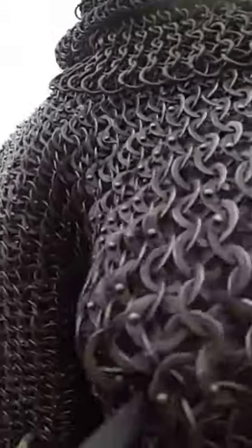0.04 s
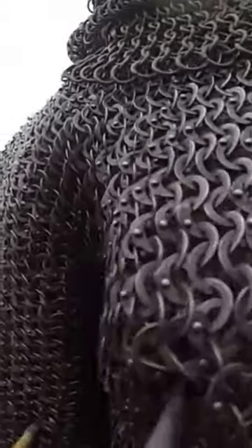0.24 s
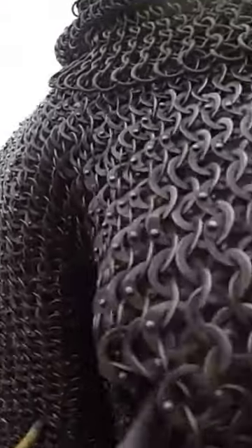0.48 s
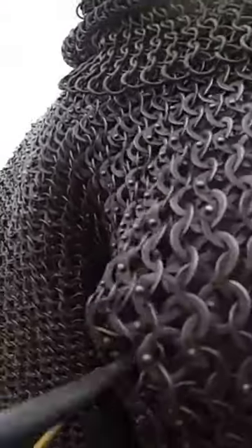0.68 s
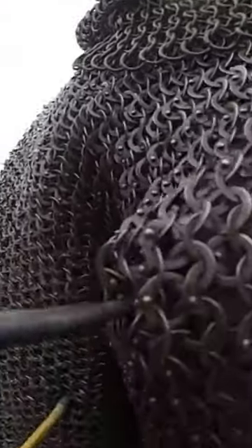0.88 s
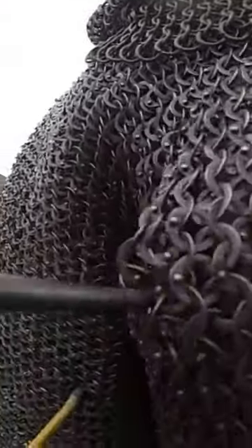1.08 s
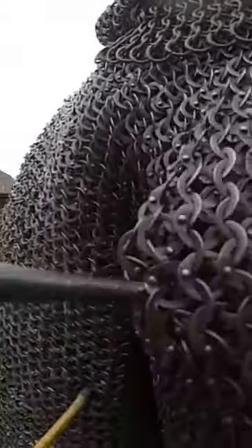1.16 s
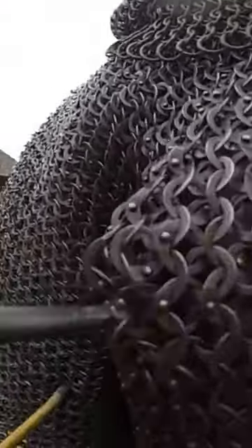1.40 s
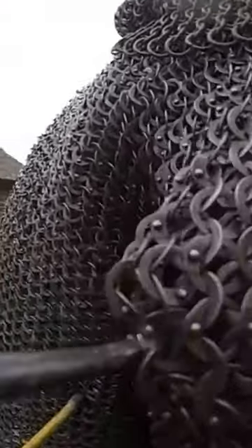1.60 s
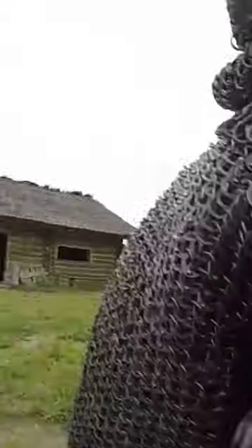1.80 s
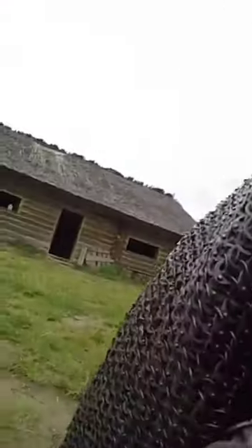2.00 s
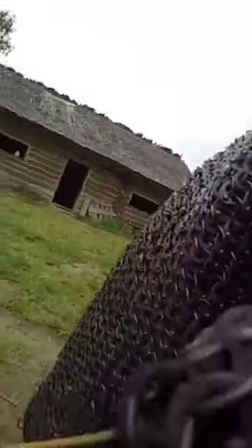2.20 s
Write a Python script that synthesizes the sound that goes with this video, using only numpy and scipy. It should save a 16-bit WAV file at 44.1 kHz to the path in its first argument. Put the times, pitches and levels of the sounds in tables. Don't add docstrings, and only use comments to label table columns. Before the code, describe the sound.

Low wind rumble slaps the microphone hard in the first second, dips, then returns more weakly; close dry wooden knocks, tiny metallic link ticks and faint ring rustles sit over a soft open-field hiss.

```python
import sys
import numpy as np
from scipy import signal
from scipy.fft import rfft, irfft
from scipy.io import wavfile
from scipy.ndimage import uniform_filter1d

SR = 44100
rng = np.random.default_rng(int(sys.argv[2]) if len(sys.argv) > 2 else 0)


def transcribe(u):
    v = np.clip(np.atleast_2d(u).T, -1, 1)
    q = np.round(v * 32767).astype(np.int16)
    wavfile.write(sys.argv[1], SR, q)


def rack_gain(trim_db):
    fader = np.asarray(trim_db, float)
    return 10 ** (fader / 20)


N = 99225


def evened(x):
    return x / np.sqrt(np.mean(x ** 2) + 1e-20)


def coloured(x, points):
    f, db = np.transpose(points)
    hz = np.fft.rfftfreq(len(x), 1 / SR)
    gain = rack_gain(np.interp(np.log(hz + 1), np.log(f + 1), db))
    return evened(irfft(rfft(x) * gain, len(x)))


def steadied(x, window_s):
    size = int(window_s * SR)
    power = uniform_filter1d(uniform_filter1d(x ** 2, size), size)
    return x / np.sqrt(abs(power) + 0.18)


def add(mix, s, sound):
    part = mix[max(round(s * SR), 0):][:len(sound)]
    part += sound[:len(part)]


def resonate(x, hz, width_hz):
    r = np.exp(-np.pi * width_hz / SR)
    return signal.lfilter([1, 0, -1], [1, -2 * r * np.cos(2 * np.pi * hz / SR), r * r], x)


def resonate_twice(x, hz, width_hz):
    return resonate(resonate(x, hz, width_hz), hz, width_hz)


def wind():
    # t/s, level/dB
    gusts = [(0, -27.5), (.07, -57), (.12, -27), (0.228, -23.5), (0.274, -7), (.39, -20), (.45, -15),
             (.78, -15), (.82, -17.5), (1.06, -19), (1.23, -32), (1.299, -21.5), (1.629, -20.5),
             (1.698, -12.5), (1.79, -22.5), (2.04, -25), (2.09, -41), (2.2, -30)]
    # start/s, length/s, level/dB
    flurries = [(0, 0.22, -32), (.25, 0.02, -30.5), (0.285, 0.039, -33), (0.389, 0.031, -29.5),
                (0.516, 0.052, -27.5), (0.58, 0.03, -13), (0.624, 0.039, -16), (0.662, 0.07, -18.5),
                (0.729, 0.05, -29.5), (0.757, 0.044, -18.5), (0.837, 0.12, -27.5), (0.973, 0.083, -31),
                (1.084, 0.13, -36), (1.29, 0.068, -32), (1.596, 0.061, -29.5), (1.668, 0.067, -24),
                (1.886, 0.05, -35.5), (1.991, .4, -48)]
    # f/Hz, level/dB
    boom_spectrum = [(8.8, -53), (15, -9.5), (38, 15.5), (76, 3), (124, -2.5), (178, -21.5), (216, -16),
                     (400, -55.5), (520, -25.5), (880, -120)]
    # f/Hz, level/dB
    flutter_spectrum = [(60, -18), (110, -0.5), (180, 3.5), (300, -14), (500, -28.5), (800, -51.5),
                        (1500, -125)]
    # f/Hz, level/dB
    rasp_spectrum = [(150, -35), (260, 8), (420, -6.5), (620, -23), (850, -40), (1500, -84)]
    flurry_edge_s, rasp_from_db = 0.00455, -21.5
    moan_hz, moan_width_hz, moan_db, moan_end_s = 180, 6, -30, 0.215

    t = np.arange(N) / SR
    gust_db = np.interp(t, *np.transpose(gusts))
    boom_noise, flutter_noise, moan_noise, lump_noise, rasp_noise = rng.standard_normal((5, N))
    boom = rack_gain(-2.5 + gust_db) * steadied(coloured(boom_noise, boom_spectrum), 0.092)

    flutter_level, rasp_level = rack_gain(-20 + gust_db), np.zeros(N)
    for start, length, level_db in flurries:
        shape = np.clip(np.minimum(t - start, start + length - t) / flurry_edge_s, 0, 1) ** 2
        flutter_level = flutter_level + rack_gain(level_db) * shape
        rasp_db = level_db - 20.0 + 0.89 * (level_db - rasp_from_db)
        rasp_level = rasp_level + rack_gain(rasp_db) * shape
    slow_noise = coloured(lump_noise, [(5, -8.0), (35, -10.5), (80, -16.0), (200, -90)])
    lumps = evened(rack_gain(1.85 * slow_noise))
    flutter = flutter_level * steadied(coloured(flutter_noise, flutter_spectrum), 0.03)
    rasp = rasp_level * steadied(coloured(rasp_noise, rasp_spectrum), 0.0033)

    moan = steadied(evened(resonate_twice(moan_noise, moan_hz, moan_width_hz)), 0.022)
    moan_swell = np.clip((moan_end_s - t) / 0.038, 0, 1) * (0.13 + 6.4 * t)
    return boom + lumps * (flutter + rasp) + rack_gain(moan_db) * moan * moan_swell


def air():
    # f/Hz, level/dB
    hiss_spectrum = [(120, -40), (200, -12), (299, -6.5), (683, -18.5), (1680, -20), (2750, -25.5),
                     (6640, -29), (14600, -41.5), (16000, -43)]
    level_db, fade_db_per_s = -52, -1
    band_hz, band_width_hz, band_db = 1790, 380, -19.5
    patchy_db, flicker_db = 1.1, 0.3

    frames = N // 128 + 6
    noise = coloured(rng.standard_normal(frames * 128), hiss_spectrum)
    z = signal.stft(noise, nperseg=512, noverlap=384)[2]
    patches = uniform_filter1d(rng.standard_normal(z.shape), 30, 0)
    patches = evened(uniform_filter1d(patches, 14, 1))
    flicker = evened(uniform_filter1d(rng.standard_normal(z.shape[1]), 5))
    z = z * rack_gain(patchy_db * patches + flicker_db * flicker)
    hiss = signal.istft(z, nperseg=512, noverlap=384)[1][:N]
    hiss = hiss + rack_gain(band_db) * hiss.std() * evened(resonate(hiss, band_hz, band_width_hz))
    top = signal.sosfilt(signal.butter(4, 600, "high", fs=SR, output="sos"), hiss)
    return hiss / top.std() * rack_gain(level_db + fade_db_per_s * (np.arange(N) / SR - 2.0))


def taps():
    # t/s, tick level/dB, knock level/dB, link ring f/Hz, knock f/Hz
    contacts = [(0.0658, -38, -36.5, 3600, 1290), (0.1245, -42, -26, 2900, 630),
                (.180, -29.5, -35, 6740, 1200), (0.2409, -38.5, -52, 9350, 900),
                (.253, -36, -43, 9200, 890), (0.2640, -34, -55.5, 12900, 700),
                (.3545, -38, -33, 7660, 2960), (0.3622, -44, -21.5, 3480, 1454),
                (.3643, -28.5, -25.5, 4420, 1616), (.3695, -54, -22.5, 4000, 1380),
                (0.676, -34.5, -37, 4100, 1190), (0.423, -35, -34, 6440, 1240),
                (0.464, -35, -42, 7900, 2050), (0.658, -41, -40, 4230, 1520),
                (0.696, -29.5, -50, 6400, 1390), (.7085, -38.5, -63, 4930, 1400),
                (0.734, -50, -33.5, 4960, 1670), (0.8358, -31, -47, 4950, 4900),
                (1.11, -41, -61, 9400, 1400), (1.2663, -45, -48, 9500, 1140),
                (1.2892, -27, -29.5, 5100, 1184), (1.298, -22, -38, 10000, 2910),
                (1.3135, -38, -34.5, 9100, 820), (1.4364, -41.5, -57, 9100, 1400),
                (1.4883, -35, -60, 6340, 1400), (1.691, -41.5, -55, 9550, 1390),
                (1.871, -52, -45, 6100, 1850), (2.022, -43, -42, 4160, 1400), (.366, -36, -30, 5200, 930),
                (.393, -38, -32, 4900, 700), (.3975, -41, -29.5, 5000, 780), (.4025, -37, -34, 4000, 1095),
                (.415, -41, -41, 4000, 1110), (.680, -30, -38.5, 6400, 3065),
                (.6985, -31.5, -55, 4900, 1410), (.719, -41, -58, 5000, 1410),
                (1.296, -24.5, -29, 5000, 1050), (1.2995, -21.5, -43, 6150, 2530),
                (1.3055, -33, -37, 7500, 1400), (1.498, -35.5, -37, 6340, 1310)]
    # f/Hz, level/dB, decay by 60 dB/s
    shaft_modes = [(486, -1.5, 0.023), (1090, -3.5, 0.023), (1394, 6, 0.017), (2024, 0.5, 0.019),
                   (2860, -2, 0.016), (4160, -6.5, 0.015)]
    main_mode_hz = shaft_modes[2][0]
    attack_s, tick_t60_s, snap_t60_s, ring_t60_s = 0.00042, 0.022, 0.0044, 0.013
    knock_gain_db, ring_db, ring_width_hz = 0.5, -3.5, 360
    knock_noise, tick_bright, snap = 0.2, 0.16, 0.79

    out, t = np.zeros(N), np.arange(2200) / SR
    tick_decay = rack_gain(-60 * t / tick_t60_s) + snap * rack_gain(-60 * t / snap_t60_s)
    noises = rng.standard_normal((len(contacts), 2, len(t)))
    for (s, tick_db, knock_db, ring_hz, knock_hz), z in zip(contacts, noises):
        knock = np.zeros(len(t))
        for k, (hz, db, t60) in enumerate(shaft_modes):
            mode_hz = hz * knock_hz / main_mode_hz * (1 + 0.023 * z[1, k])
            knock += rack_gain(db - 60 * t / t60) * np.sin(2 * np.pi * mode_hz * t + z[1, k + 9])
        roughness = 8 * uniform_filter1d(uniform_filter1d(z[0], size=20), size=14)
        knock = knock * (1 + knock_noise * roughness) / 2
        tick = signal.lfilter([1, -tick_bright], [1], z[1]) * tick_decay / 3
        ring = resonate(z[0] * rack_gain(-60 * t / ring_t60_s), ring_hz, ring_width_hz)
        link = tick + rack_gain(ring_db) * ring / abs(ring).max()
        contact = rack_gain(knock_db + knock_gain_db) * knock + rack_gain(tick_db) * link
        add(out, s, np.minimum(t / attack_s, 1) * contact)
    return out


def rustles():
    # start/s, length/s, level/dB, centre f/Hz
    slides = [(0.088, 0.01, -49.5, 5660), (0.129, 0.032, -47.5, 9200), (0.345, 0.023, -54, 7000),
              (0.373, 0.024, -45, 6500), (0.261, 0.15, -52, 1890), (0.463, 0.016, -44.5, 1950),
              (0.383, 0.03, -45, 1350), (0.432, 0.051, -52, 6250), (0.433, 0.022, -46, 1890),
              (0.568, 0.12, -54.5, 1930), (0.671, 0.018, -48, 3070), (0.69, 0.024, -49.5, 5800),
              (0.895, 0.059, -56.5, 4600), (1.003, 0.056, -54, 4470), (1.157, .05, -59.5, 9100),
              (1.304, 0.011, -55, 8900), (1.493, 0.025, -59, 6900), (1.67, 0.078, -61, 5500),
              (1.861, 0.14, -56, 1870), (0.468, 0.014, -64, 7200), (0.553, 0.025, -60, 8700),
              (0.946, 0.13, -63, 10200), (1.894, 0.11, -61, 5600), (2.121, .12, -65, 2830),
              (0.42, 0.02, -58, 13000)]
    grains_per_s, grain_spread_db = 9000, -1.5
    relative_width, wide_db = 0.83, -5

    out = np.zeros(N)
    for (s, length, db, hz), z in zip(slides, rng.random((len(slides), 3, 8000))):
        n = int(length * SR)
        hits = z[0] < grains_per_s / SR
        grains = hits * np.sign(z[1] - 0.5) * rack_gain(-grain_spread_db * np.log(z[2] + 0.017))
        body = evened(resonate_twice(grains, hz, relative_width * hz))
        wide = evened(signal.lfilter([1, -0.4], [1], grains))
        swell = np.sin(np.pi * (np.arange(n) / n) ** 1.16) ** 0.095
        add(out, s, rack_gain(db) * (body + rack_gain(wide_db) * wide)[:n] * swell)
    return out


def slaps():
    # centre t/s, peak level/dB, f/Hz, length/cycles
    eddies = [(0.142, -26, 40, 0.73), (0.267, 1.5, 64, 2.44), (0.328, -3, 72.8, 0.79),
              (0.438, -2.5, 43.4, 1.16), (0.484, -6, 61, 1.16), (.545, -5.5, 34.5, 0.81),
              (0.601, -3, 85, 0.7), (.64, -10, 171, 3.3), (0.669, -3.5, 87, 1.2), (0.687, -8, 44, 1.55),
              (0.737, -1.5, 109.6, 2.08), (0.769, -5, 117, 1.2), (0.788, -2.5, 74, 0.92),
              (0.898, -7.5, 56.4, 1.17), (0.943, -8.5, 44.8, 0.39), (1.055, -13.5, 42, 1.3),
              (1.324, -10, 85, 1.64), (1.35, -15.5, 39.2, 1.25), (1.442, -21.5, 51.3, 0.88),
              (1.518, -14.5, 67.6, 1.2), (1.608, -17, 60, 0.73), (1.667, -6.5, 79, 0.81),
              (1.688, -4, 59, 1.6), (1.725, -4.5, 66, 1.76), (1.769, -11.5, 37.6, 0.42),
              (1.906, -9, 44, 0.61), (.551, -20, 244, 1), (.590, -15.5, 262, 1.36), (0.627, -22, 326, 0.92),
              (0.704, -12.5, 230, 1.16), (.765, -16.5, 333, 0.72), (.794, -18.5, 372, 0.85),
              (.891, -27, 230, 0.89), (1.318, -22, 229, 0.69), (1.349, -30.5, 262, 4.2),
              (1.605, -21, 244, 1.1), (1.693, -11.5, 150, 2), (.25, -30, 246, 1.8), (.37, -24.5, 150, 2.3),
              (0.922, -14.5, 130, 2.7), (0.564, -12, 110, 1.3), (1.022, -19.5, 109, 2.4),
              (1.083, -36.5, 396, 2), (1.43, -19.5, 97.5, 1), (1.643, -12.5, 109, 1.2),
              (.265, -36.5, 604, 2.7), (.642, -17, 275, 2.7), (.125, -29, 454, 0.73),
              (.46, -20.5, 146, 2.2), (1.264, -30.5, 220, 2.3)]
    glide, ragged = 0.071, 0.087

    out = np.zeros(N)
    for (s, db, hz, cycles), phase in zip(eddies, rng.random(len(eddies))):
        u = np.arange(-0.06, 0.06, 1 / SR) * hz / cycles
        turn = 2 * np.pi * (cycles * (u + glide * u ** 2) + phase)
        swing = np.cos(turn) + ragged * np.cos(2 * turn + 9 * phase)
        add(out, s - 0.06, rack_gain(db) * np.exp(-3.5 * u ** 2) * swing)
    return out


def scene():
    return (wind() + air() + taps() + rustles() + slaps())[None]


def band_limit(x):
    return signal.sosfilt(signal.butter(12, 16650, fs=SR, output="sos"), x)


def record(dry):
    edge = signal.firwin(151, 15600, window=("kaiser", 5), fs=SR)[None]
    mix = np.clip(signal.oaconvolve(dry, edge, "same"), -1, 1)
    return band_limit(mix)


dry = scene()
out = record(dry)
transcribe(out)
```